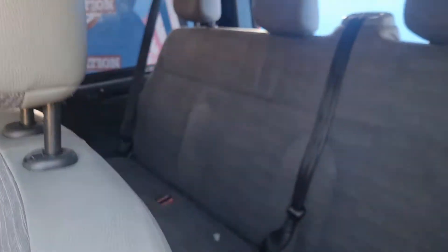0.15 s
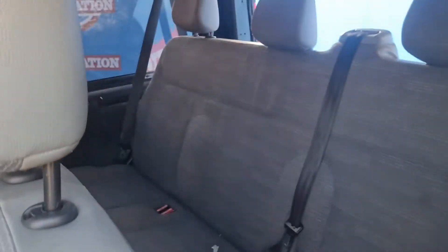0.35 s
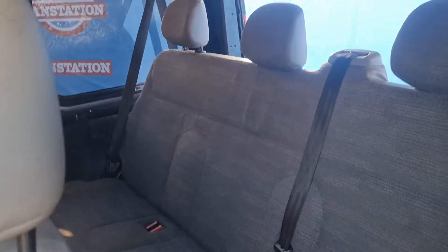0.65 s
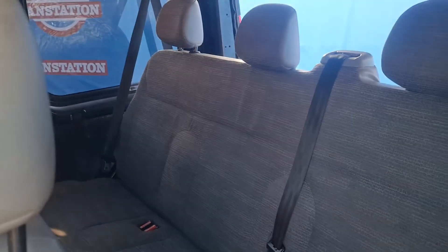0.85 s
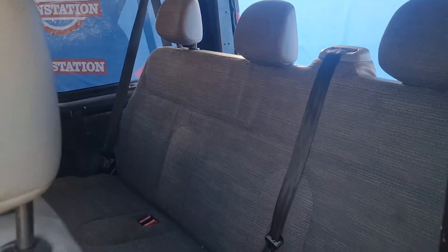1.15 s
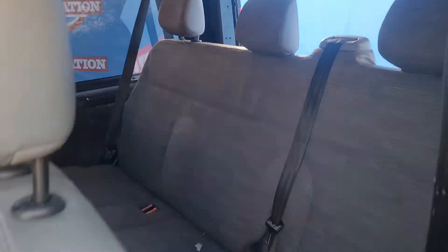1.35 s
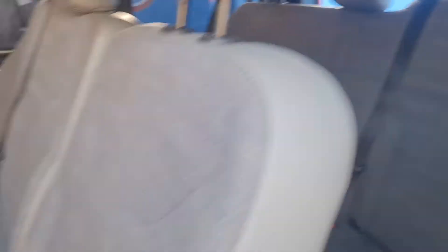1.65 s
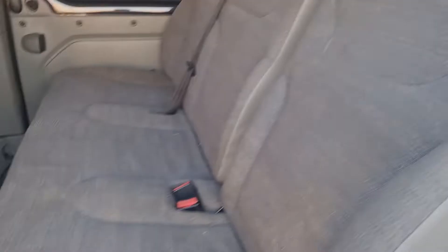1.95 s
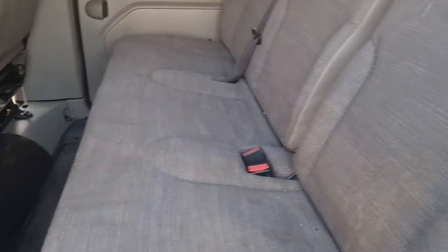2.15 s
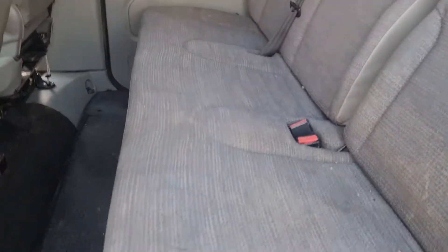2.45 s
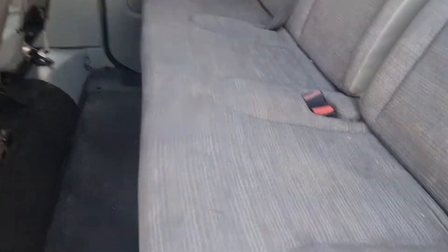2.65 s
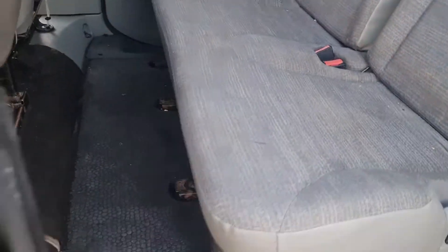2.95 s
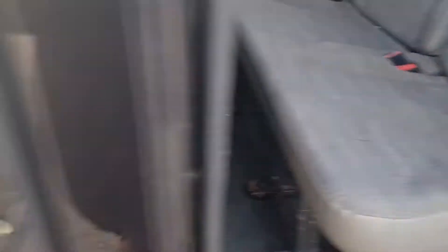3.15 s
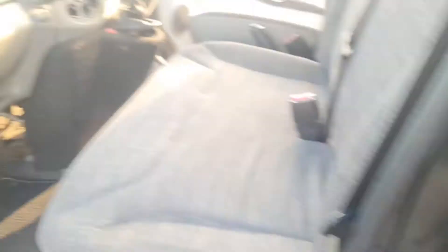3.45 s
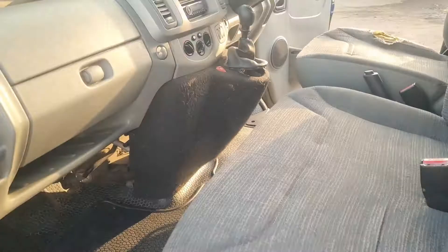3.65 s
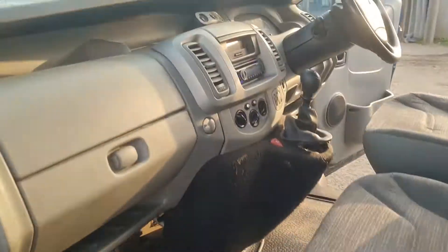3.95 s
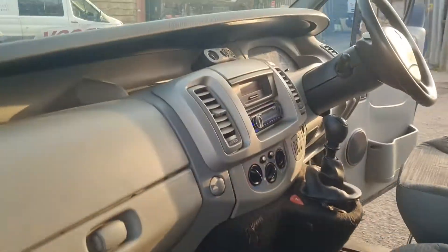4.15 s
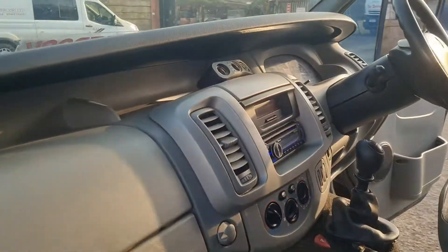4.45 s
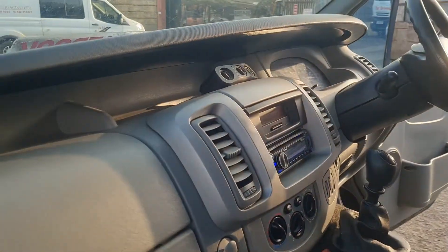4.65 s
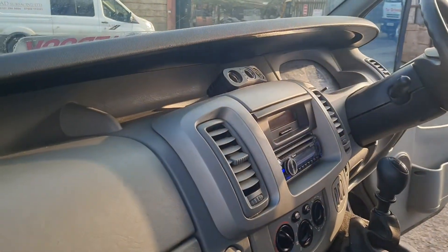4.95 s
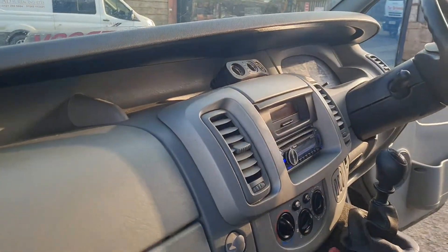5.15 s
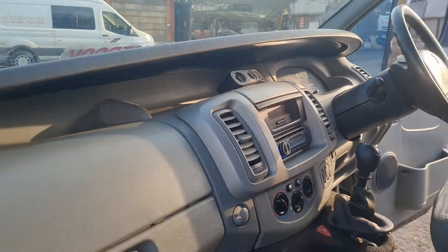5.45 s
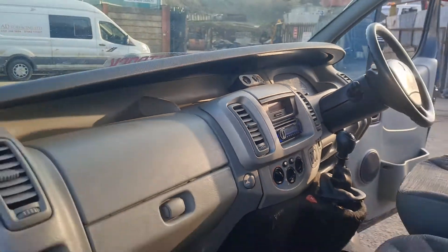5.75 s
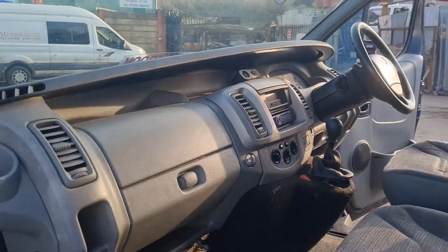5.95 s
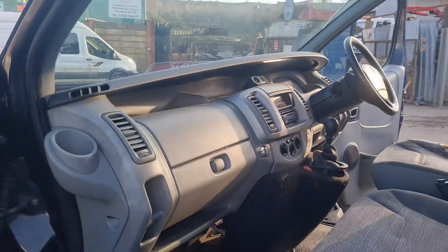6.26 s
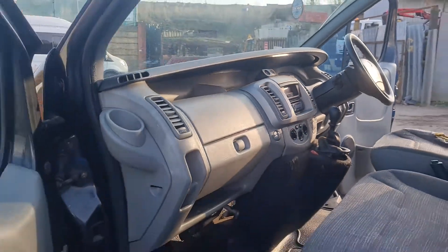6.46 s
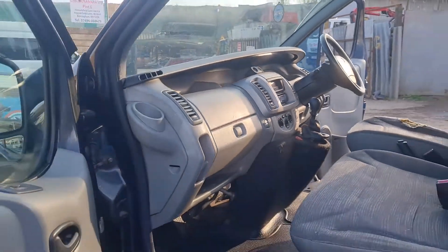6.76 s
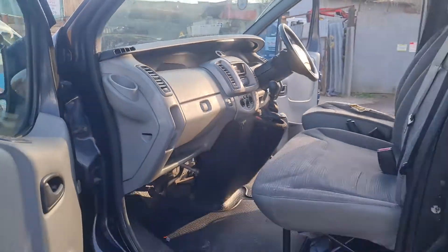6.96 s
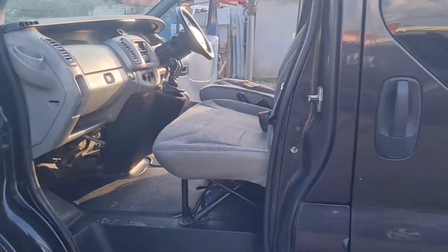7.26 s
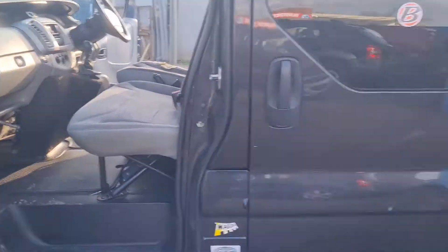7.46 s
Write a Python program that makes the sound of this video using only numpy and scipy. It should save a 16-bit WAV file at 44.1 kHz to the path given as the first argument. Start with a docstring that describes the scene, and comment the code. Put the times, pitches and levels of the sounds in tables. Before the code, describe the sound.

A handheld stereo phone close to a van picks up a pulsing diesel idle. A sliding door on the right clunks free, rolls with a hollow growl and loose rattling, then crashes shut, shaking the body shell. Afterwards the idle shifts leftward and dulls, with close scuffs and hollow taps from handling, then opens out near the front door with rising clatter and fine hiss.

```python
"""A four-cylinder diesel van idles in a yard: looped and fresh noise, pulsed at each firing, under steady cycle tones.
The sliding door leaves its catch (knocks, modes), rumbles along its track (noise and whirr led by door speed),
rattles into the latch and slams, booming shell and cabin (noise bursts, damped modes).
The phone swings round; the shut door screens the engine, among handling ticks, until the phone comes out by the
front door, where bands of engine noise climb, a fine hiss sets in and a bright band chirps."""
import sys
import numpy as np
from scipy import signal
from scipy.fft import rfft, irfft, next_fast_len
from scipy.io import wavfile
from scipy.ndimage import uniform_filter1d

SR = 44100
rng = np.random.default_rng(int(sys.argv[2]) if len(sys.argv) > 2 else 0)


def pcm_store(signal):
    """Save signal as 16-bit PCM."""
    levels = np.round(np.clip(np.atleast_2d(signal), -1, 1) * 32767)
    wavfile.write(sys.argv[1], SR, levels.astype(np.int16).T)


N = 335601
T = np.arange(N) / SR  # s
CENTRE = np.array([[1], [0]])  # (mid, side) of a centred sound

FIRING_HZ = 30.0
# exhaust tones, then block tones: multiple_of_four_firing_cycle, level_db
EXHAUST_ORDERS = [(7, -3.5), (8, 0), (10, -12), (16, -18)]
BLOCK_ORDERS = [(32, -4.5), (36, -8), (44, -3), (56, -12)]
# outlines of exhaust puffs, block drone, diesel clatter, engine hiss: freq_hz, density_db_per_hz
PUFF = [(52, 10), (100, -2), (180, -22)]
DRONE = [(30, -7), (50, 0), (110, -3), (185, -9), (320, -3.5), (600, -10.5), (1000, -21), (2500, -73)]
CLATTER = [(300, -24), (600, 3), (1000, 4.5), (2300, -6.5), (3000, -12.5), (8000, -33.5)]
HISS = [(2000, -29), (4000, -1.5), (6300, 0), (7400, -5), (8300, -10.5), (10000, -6), (12200, -3.5),
        (15500, -44)]
# engine bay heard from outside the cabin, then cabin resonances and metallic engine ring: freq_hz, width_hz,
# level_db
BAY = [(255, 61, 6), (1600, 1100, -22)]
ZING = [(970, 99, 19.5), (1303, 20, 20.5), (3470, 320, 2), (6100, 250, -4)]
# openness of the engine's path past the van body: time_s, exposure_db
EXPOSURE = [(0, 0), (1.7, 0), (4.15, -7.5), (4.8, -11), (5.6, -1.5), (6.1, -.5), (7.6, 5.5)]
# exhaust boom, which bends round the body: time_s, level_db
BOOM = [(1.0, -41.5), (4.8, -43.5), (5.6, -37.5), (7.6, -45)]
# engine layers: level_db at exposure 0, slope_db_per_db
BLOCK_LAW = (-42.5, 1.01)
CLATTER_LAW = (-46, 1)
HISS_LAW = (-62.5, 0.92)
ZING_LAW = (-54, 1)
# the bay comes into the open as the phone nears the front door
BAY_OPEN_S, BAY_DB, BAY_APPROACH_DB_PER_S, BAY_OPEN_DB_PER_S = 6.42, -38.5, 18, 2.5
CLEAR_S, CLEAR_HISS_DB = 7.08, -58.5  # phone clear of the front door
TURN_S = 3.9  # phone swings round to face the cab

# climbing band of clatter: time_s, centre_hz, level_db
CLIMB = [(6.299, 1097, -59), (6.75, 1328, -48), (7.05, 1512, -52.5), (7.599, 1717, -47)]
CLIMB_HALF_WIDTH_HZ = 95
UPPER_RATIO, UPPER_DB = 1.33, -5.5  # second band above the climbing one
# bright chirps: peak_s, level_db, half_length_s
CHIRPS = [(7.16, -50, 0.025), (7.38, -50, 0.035), (7.56, -49, 0.075)]
CHIRP_HZ, CHIRP_WANDER_HZ, CHIRP_HALF_WIDTH_HZ = 3520, 80, 110

# short noise swells, one as the sound begins, one as the phone moves: peak_s, level_db, half_length_s
NOISE_SWELLS = [(.02, -45, 0.052), (6.42, -48.5, 0.16)]
# handling ticks and scuffs: start_s, dull_db, bright_db, t60_s, left_minus_right_db
TICKS = [(1.83, -56, -41, 0.037, -5), (4.3653, -38, -62, 0.059, 2), (4.385, -47, -52, 0.11, 3),
         (4.4797, -43, -53, 0.092, -4), (4.575, -44.5, -58, 0.096, -3), (5.279, -41, -54, 0.07, -8),
         (5.3352, -39.5, -51, 0.18, -2), (5.407, -43, -41, 0.033, 6), (6.153, -32.5, -66, 0.033, 1),
         (6.1907, -40, -59, 0.16, -21), (6.202, -36.5, -51, 0.44, -17), (6.5104, -41, -46, 0.24, -5),
         (7.327, -33, -46, 0.097, -6), (7.442, -62, -36, 0.024, -6), (7.546, -54, -37.5, 0.029, 2)]
# hollow handling taps: start_s, pitch_hz, level_db
TAPS = [(6.204, 1290, -35), (6.3005, 720, -29)]
TAP_T60_S = 0.045
# outline of a dull scuff: freq_hz, density_db_per_hz
SCUFF = [(300, 9), (700, 5), (1400, 0), (6000, -23.5)]

# door speed on its track: time_s, share_of_full_speed
SPEED = [(2.09, 0.38), (2.14, 0.57), (2.28, 0.67), (2.55, 0.53), (2.95, 0.71), (3.15, 0.84), (3.43, 1),
         (3.57, 1), (3.65, 0.86)]
FREE_S, SHUT_S, RAMP_S = 1.96, 3.74, 0.045  # door free to roll between the first two
WHIRR_HZ = 277.7  # rollers at full speed, before wander
# rolling layers: level_db at full speed, slope_db_per_doubling of speed
WHIRR_LAW = (-20.5, 18.5)
SKIN_LAW = (-20.5, 11)
TRACK_LAW = (-30, 14.6)
GRIT_LAW = (-44.5, 8.9)
CHATTER_LAW = (-37, 15)
# resonances of hollow side panel, door skin, loose fittings: freq_hz, width_hz, level_db
RUMBLE = [(82, 37, -15.5), (119.3, 15, 0)]
PANEL = [(65, 72, -6), (212.1, 9.4, 5.5), (265.6, 48, 2), (299.4, 16.6, -1), (347.5, 13.7, 1.5),
         (426, 69, -7)]
FITTINGS = [(505, 84, 7), (910, 91, 0), (1760, 1900, -25.5)]
# outlines of track rumble and grit: freq_hz, density_db_per_hz
TRACK = [(250, 16.5), (500, 6), (1300, -6.5), (4000, -39.5)]
GRIT = [(700, 8.5), (4500, 1), (7000, -4.5), (8300, -19), (11000, -22)]
# side panel sounds once the rollers are on its rail, less as they run forward
RAIL_S, RAIL_DB, RAIL_FADE_DB_PER_S = 2.1, -26.5, -5
# surges over uneven track: middle_s, change_db, half_length_s
SURGES = [(2.141, 4.5, 0.024), (2.177, -3, 0.01), (2.253, 2, 0.042), (2.327, -6, 0.012), (2.449, -4, 0.032),
          (3.132, 3, 0.024), (3.313, 1.5, 0.062), (3.558, 3, 0.0071), (3.635, -4, 0.016)]
# rollers scrape past the phone: peak_s, level_db, half_length_s
SCRAPES = [(3.035, -52, 0.031), (3.2, -53.5, 0.046)]
SCRAPE_STEEL_DB = 1  # steel noise against sizzle, a little louder
SIZZLE_DB = -63  # fine contact noise while rolling
CHATTER_PER_S = 41  # mean taps of loose fittings

# blows off the catch, then of rollers and latch: start_s, knock_db, ring_db, steel_db, t60_s
CATCH_BLOWS = [(1.9165, -26.5, -33, -54, 0.11), (1.9225, -25, -23, -40, 0.086),
               (1.9325, -26, -28, -57, 0.064), (1.963, -30, -35.5, -55, 0.056)]
LATCH_BLOWS = [(2.3475, -20.5, -28.5, -37.5, 0.068), (3.155, -26, -33, -45.5, 0.074),
               (3.222, -27.5, -44, -54, 0.054), (3.311, -28, -39, -44, 0.08),
               (3.6548, -17.5, -18, -29, 0.024), (3.677, -20.5, -37, -34, 0.16),
               (3.6925, -23, -28, -30, 0.05), (3.703, -20.5, -17, -23.5, 0.065),
               (3.7215, -19, -13.5, -30.5, 0.059), (3.730, -10.5, -24, -21, 0.059),
               (3.738, -13.5, -17, -22.5, 0.11), (3.755, -23, -27, -25, 0.053),
               (3.769, -27, -25, -45, 0.28), (3.889, -53, -56, -48.5, 0.093),
               (3.9295, -31.5, -43, -66, 0.017), (3.9712, -38.5, -55, -66, 0.035)]
# modes of catch and hollow door, then door frame and latch: pitch_hz, level_db, longest_t60_s
CATCH_MODES = [(193.6, -1, 0.2), (308, 2.5, 0.12), (645, -3.5, 0.3), (956, -6, 0.16), (1483, 2, 0.039),
               (2130, -4, 0.059), (2686, -6.5, 0.04)]
FRAME_MODES = [(233.5, 0.5, 0.2), (458.3, 1.5, 0.11), (508, -6, 0.36), (575, -13, 0.33), (689, -8, 0.29),
               (780, -10, 0.24), (1318, -15.5, 0.097), (1795, -11.5, 0.19), (2266, -24, 0.2)]
# outlines of door knock, steel clash, finest steel contact, cabin echo: freq_hz, density_db_per_hz
KNOCK = [(100, -16), (200, 13.5), (500, 12), (900, 4), (2600, -4), (4200, -22), (8000, -53)]
STEEL = [(1500, -9), (3500, 6), (7000, 5), (8400, -6), (12500, -10.5), (15500, -36)]
SIZZLE = [(9000, -4), (10800, 8.5), (12300, 7.5), (14000, -9), (15500, -15)]
CABIN = [(55, 9.5), (300, -2), (900, -22.5), (6000, -49)]
MODE_SCATTER = 0.0071  # detuning spread, share of pitch
CRACK_DB, CRACK_T60_S = -10, 0.0084  # first instant of steel contact, against its clash
# thin ring of the latch's steel parts: pitch_hz
LATCH_HZ = [3000, 3671, 4531, 5700, 7440]
LATCH_DB, LATCH_T60_S = -14, 0.15  # against the clash
RING_HOLD = 3  # struck part stays pressed: longest ring, in blow t60s
# pushes on the body shell: middle_s, level_db, contact_s
THUMPS = [(3.6949, -15, 0.0011), (3.7365, -3, 0.0061), (3.7552, -6.5, 0.0043), (3.779, -4.5, 0.0066),
          (3.801, -13.5, 0.0038)]
# body shell and cabin air modes: pitch_hz, level_db, t60_s
SHELL_MODES = [(35.4, -10, 0.82), (47, -2, 0.37), (79.6, -10, 0.43), (140, -4.5, 0.14), (235, -3, 0.45),
               (271, 8.5, 0.35), (291.5, 3, 0.35)]

# microphone pair: freq_hz, side_minus_mid_db
WIDTH = [(50, -2.5), (150, -34), (280, -27), (550, -2.5), (2500, 0.5)]
# microphone pair: freq_hz, left_minus_right_db at full lean
LEAN = [(50, -2.5), (500, -1.5), (1200, 0), (3000, 3), (7000, -1.5), (10000, -7.5), (13000, 26.5)]
TOP_HZ = 15900


def undb(db):
    """Decibels to gain."""
    return 10 ** (np.asarray(db) / 20)


def unit(x):
    """Scale to rms 1."""
    return x / np.sqrt(np.mean(x ** 2))


def spectrum_axis(size):
    """FFT bin frequencies in Hz, floored at 1."""
    return np.maximum(np.fft.rfftfreq(size, 1 / SR), 1)


def colour(x, points):
    """Filter by a (Hz, dB) outline with 12 dB per octave skirts beyond its ends."""
    hz, db = np.transpose(points)
    size = next_fast_len(x.shape[-1])
    f = spectrum_axis(size)
    skirt = np.minimum(f / hz[0], 1) ** 2 * np.minimum(hz[-1] / f, 1) ** 2
    gain = skirt * undb(np.interp(np.log(f), np.log(hz), db))
    return irfft(rfft(x, size) * gain, size)[..., :x.shape[-1]]


def tilt(x, points, share=1):
    """Broad gain against frequency, flat beyond the ends."""
    hz, db = np.transpose(points)
    size = next_fast_len(N)
    gain = undb(share * np.interp(np.log(spectrum_axis(size)), np.log(hz), db))
    return irfft(rfft(x, size) * gain, size)[:N]


def resonate(x, modes):
    """Steep resonances (Hz, width Hz, dB) in parallel, summed to rms 1."""
    out = 0
    for hz, width_hz, db in modes:
        b, a = signal.iirpeak(hz, hz / width_hz / 2 ** .5, fs=SR)
        once = signal.lfilter(b, a, x)
        out = out + undb(db) * signal.lfilter(b, a, once)
    return unit(out)


def noise(size=N):
    """Unrelated mid and side noise."""
    return rng.standard_normal((2, size))


def walk(rate_hz):
    """Smooth chance with a spread near 1."""
    k = int(SR / rate_hz)
    steps = np.repeat(rng.standard_normal(N // k + 1), k)[:N]
    return 1.087 * uniform_filter1d(steps, k)


def curve(rows):
    """Join (s, value) points by straight lines."""
    return np.interp(T, *np.transpose(rows))


def follow(control, law):
    """Gain whose dB level follows a control: law is (dB, dB per unit)."""
    db, slope = law
    return undb(db + slope * control)


def ramp(since_s):
    """Linear rise from 0 to 1 over RAMP_S."""
    return np.clip(since_s / RAMP_S, 0, 1)


def swells(rows):
    """Summed Gaussian swells: (s at the peak, dB, half length s)."""
    return sum(undb(db) * np.exp(-((T - s) / half_s) ** 2) for s, db, half_s in rows)


def fade(t60_s):
    """Half a second of exponential decay."""
    return np.exp(-np.log(1000) * T[:SR // 2] / t60_s)


def burst(points, envelope):
    """Noise under an envelope, coloured afterwards so that a dull burst also starts dull."""
    raw = noise(len(envelope))
    shaped = colour(raw * envelope, points) / np.std(colour(raw, points))
    return shaped * (T[:len(envelope)] < .45)


def ringing(hz, t60_s):
    """One mode, slightly detuned, which builds up over the contact and dies away."""
    t = T[:SR // 2]
    turns = hz * (1 + MODE_SCATTER * rng.standard_normal()) * t + rng.random((2, 1))
    build_up = 1 - np.exp(-t * hz * 2)
    return np.sin(2 * np.pi * turns) * fade(t60_s) * build_up


def moving_band(hz, half_width_hz):
    """Narrow band of noise whose centre moves: low-passed complex noise, shifted up."""
    lowpass = signal.butter(2, half_width_hz, fs=SR, output="sos")
    band = signal.sosfilt(lowpass, noise() + 1j * noise())
    return unit(np.real(band * np.exp(2j * np.pi * np.cumsum(hz) / SR)))


def add(out, s, sound):
    """Mix a sound in at s seconds."""
    start = int(s * SR)
    out[:, start:start + sound.shape[-1]] += sound[:, :N - start]


def cycling(repeat, count=4):
    """Rattle of which a share (of power) comes back after every count firings."""
    size = int(round(count * SR / FIRING_HZ))
    share = np.clip(repeat, 0, 1)
    cycle = unit(irfft(np.exp(2j * np.pi * rng.random((2, size // 2 + 1))), size))
    return share ** .5 * cycle[:, np.arange(N) % size] + (1 - share) ** .5 * noise()


def tones(orders, waver_db):
    """Multiples of the four-firing cycle, each wavering a little in level."""
    turn = 2 * np.pi * T * FIRING_HZ / 4
    out = 0
    for k, db in orders:
        gain = undb(db + waver_db * walk(5.4)) * 2 ** .5
        out = out + gain * np.sin(round(k) * turn + 2 * np.pi * rng.random())
    return out


def engine():
    """Exhaust beat and puffs, droning block, and clatter that jumps up at each firing and decays."""
    exposure_db = curve(EXPOSURE)
    firing = unit(1 + 0.61 * np.exp(-(T * FIRING_HZ % 1) / 0.46))

    puffs = undb(-8.5) * unit(colour(cycling(1.0), PUFF))
    exhaust = undb(curve(BOOM)) * (CENTRE * tones(EXHAUST_ORDERS, waver_db=1.0) + puffs)

    drone = undb(3.0) * unit(colour(cycling(0.44, count=2) * firing, DRONE))
    block = follow(exposure_db, BLOCK_LAW) * (CENTRE * tones(BLOCK_ORDERS, waver_db=1) + drone)

    clatter = follow(exposure_db, CLATTER_LAW) * unit(colour(cycling(0.26) * firing, CLATTER))
    flicker = undb(1.5 * walk(90) + 0.31 * walk(23))
    hiss = follow(exposure_db, HISS_LAW) * unit(colour(noise() * flicker, HISS))
    zing = follow(exposure_db, ZING_LAW) * undb(2.0 * walk(16)) * resonate(noise() * firing, ZING)

    fine = unit(colour(noise() * firing * undb(7.0 * walk(60)), SIZZLE))
    clear_hiss = ramp(T - CLEAR_S) * undb(CLEAR_HISS_DB) * fine

    bay_slope = np.where(T < BAY_OPEN_S, BAY_APPROACH_DB_PER_S, BAY_OPEN_DB_PER_S)
    bay_gain = undb(BAY_DB + (T - BAY_OPEN_S) * bay_slope)
    bay = bay_gain * resonate(cycling(0.36, count=2) * firing, BAY)
    return exhaust + block + clatter + hiss + zing + clear_hiss + bay


def climbing_band():
    """Outside the van two bands of engine noise waver and rise in pitch together, and a brighter one chirps."""
    s, hz, db = np.transpose(CLIMB)
    centre_hz = np.interp(T, s, hz)
    lower = undb(2 * walk(40)) * moving_band(centre_hz, CLIMB_HALF_WIDTH_HZ)
    upper = undb(2 * walk(40)) * moving_band(centre_hz * UPPER_RATIO, CLIMB_HALF_WIDTH_HZ)
    climb = undb(np.interp(T, s, db)) * (lower + undb(UPPER_DB) * upper)
    chirp_hz = CHIRP_HZ + CHIRP_WANDER_HZ * walk(25)
    return climb + swells(CHIRPS) * moving_band(chirp_hz, CHIRP_HALF_WIDTH_HZ)


def swells_and_handling():
    """Short noise swells; handling ticks, scuffs and hollow taps, mostly closer to one port: (left, right)."""
    out = swells(NOISE_SWELLS) * unit(colour(noise(), GRIT))
    for s, dull_db, bright_db, t60_s, pan_db in TICKS:
        # only the left port is keen in the top octave
        bright = burst(STEEL, fade(t60_s)) + undb([[1], [-18]]) * burst(SIZZLE, fade(t60_s))
        sound = undb(dull_db) * burst(SCUFF, fade(t60_s)) + undb(bright_db) * bright
        add(out, s, sound * undb([[pan_db / 2], [-pan_db / 2]]))
    for s, hz, db in TAPS:
        hollow = ringing(hz, TAP_T60_S)[:1]
        add(out, s, undb(db) * (hollow + .5 * burst(SCUFF, fade(TAP_T60_S / 2))))
    return out


def rolling():
    """Rollers whirr and bump, shaking panel and door skin; fittings chatter, grit crackles; most grow with speed."""
    speed = np.maximum(curve(SPEED), .01)
    doublings = np.log2(speed)
    moving = ramp(T - FREE_S) * ramp(SHUT_S - T)
    load = undb(sum(db * np.exp(-((T - s) / half_s) ** 2) for s, db, half_s in SURGES))
    bumps = noise() * undb(1.8 * walk(50))
    grains = noise() * undb(2.2 * walk(700) + 1.2 * walk(45))

    turn = 2 * np.pi * np.cumsum(WHIRR_HZ * speed * (1 + 0.0544 * walk(80))) / SR
    whirr = CENTRE * follow(doublings, WHIRR_LAW) * undb(2.0 * walk(45)) * np.sin(turn)
    rail_gain = ramp(T - RAIL_S) * undb(RAIL_DB + RAIL_FADE_DB_PER_S * (T - RAIL_S))
    rumble = rail_gain * resonate(bumps, RUMBLE)
    skin = follow(doublings, SKIN_LAW) * resonate(bumps, PANEL)
    track = follow(doublings, TRACK_LAW) * unit(colour(grains, TRACK))

    grit = follow(doublings, GRIT_LAW) * unit(colour(grains, GRIT))
    sizzle = unit(colour(grains, SIZZLE))
    steel = undb(SCRAPE_STEEL_DB) * unit(colour(noise(), STEEL))
    scrape = swells(SCRAPES) * (sizzle + steel)
    # chance taps, with mid and side signs drawn apart
    taps = (rng.random(N) < CHATTER_PER_S / SR) * (1 + rng.random(N)) * np.sign(noise())
    chatter = follow(doublings, CHATTER_LAW) * resonate(taps, FITTINGS)

    loaded = load * (whirr + rumble + skin + track)
    return moving * (loaded + chatter + grit + undb(SIZZLE_DB) * sizzle + scrape)


def strikes(blows, modes, knock_scale, cabin_db, cabin_t60_s):
    """Each blow knocks and cracks steel, rings the struck part and latch, and dies away in the cabin."""
    out = np.zeros((2, N))
    for s, knock_db, ring_db, steel_db, t60_s in blows:
        knock = burst(KNOCK, fade(t60_s * knock_scale))
        cabin = undb(cabin_db) * burst(CABIN, fade(cabin_t60_s))
        clash = fade(t60_s) + undb(CRACK_DB) * fade(CRACK_T60_S) + undb(-19) * fade(0.41)
        # a harder blow makes a shorter contact and reaches higher
        steel = burst(STEEL, clash) + undb(0.54 * steel_db + 3.5) * burst(SIZZLE, clash)
        latch = undb(LATCH_DB) * sum(rng.random() * ringing(hz, LATCH_T60_S) for hz in LATCH_HZ)
        ring = sum(undb(db) * ringing(hz, min(longest_s, RING_HOLD * t60_s)) for hz, db, longest_s in modes)
        body = undb(knock_db) * (knock + cabin) + undb(ring_db) * ring
        add(out, s, body + undb(steel_db) * (steel + latch))
    return out


def shell():
    """Hard contacts ring the panels; the slow squeeze of the rubber seal pumps the cabin air."""
    push = np.zeros(N)
    for s, db, contact_s in THUMPS:
        pulse = np.exp(-np.pi * (2 * (T - s) / contact_s) ** 2)
        push += undb(db) * pulse / pulse.sum()
    t = T[:SR]
    ring = 0
    for hz, db, t60_s in SHELL_MODES:
        ring = ring + undb(db) * np.sin(2 * np.pi * hz * t) * np.exp(-np.log(1000) * t / t60_s)
    return CENTRE * undb(-6.5) * signal.fftconvolve(push, ring)[:N]


def ports(pair, left_lag_s, diffuse_db, lean=1):
    """(mid, side) to two ports that agree in the bass, differ in the treble; the nearer hears first."""
    mid, side = pair[0], undb(diffuse_db) * tilt(pair[1], WIDTH)
    lag = int(left_lag_s * SR / 2)
    left = tilt(np.roll(mid + side, lag), LEAN, lean / 2)
    right = tilt(np.roll(mid - side, -lag), LEAN, -lean / 2)
    return np.array([left, right])


def scene():
    """Door to the right of the phone; engine from the right, then from the left once the phone has turned."""
    idle, turned = engine() + climbing_band(), ramp(T - TURN_S)
    catch = strikes(CATCH_BLOWS, CATCH_MODES, knock_scale=1.9, cabin_db=-15, cabin_t60_s=0.95)
    slam = shell() + strikes(LATCH_BLOWS, FRAME_MODES, knock_scale=1.53, cabin_db=-2, cabin_t60_s=0.48)
    after_turn = ports(idle * turned, left_lag_s=-.00052, diffuse_db=-1.5, lean=0.81)
    before_turn = ports(rolling() + idle * (1 - turned), left_lag_s=.00042, diffuse_db=-1.35, lean=0.7)
    blows = ports(catch + slam, left_lag_s=.00042, diffuse_db=-1.5, lean=0.76)
    return after_turn + swells_and_handling() + before_turn + blows


def record(dry):
    """The phone drops the deepest bass, limits peaks hard at full scale and cuts the top."""
    highpass = signal.butter(6, 32, "high", fs=SR, output="sos")
    lowpass = signal.ellip(8, .2, 70, TOP_HZ, fs=SR, output="sos")
    thin = signal.sosfilt(highpass, dry)
    return signal.sosfilt(lowpass, np.clip(thin, -1, 1))


dry = scene()
out = record(dry)
pcm_store(out)
```